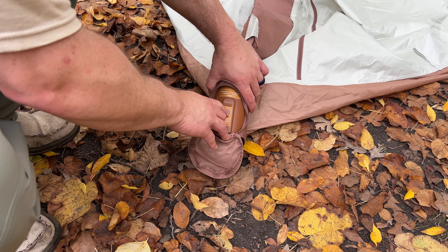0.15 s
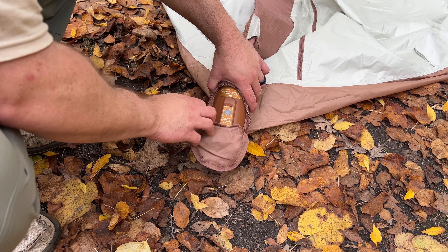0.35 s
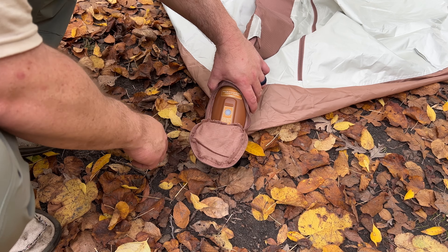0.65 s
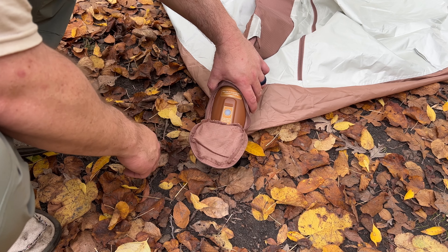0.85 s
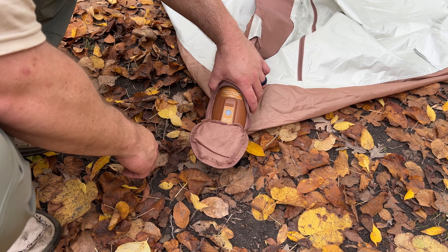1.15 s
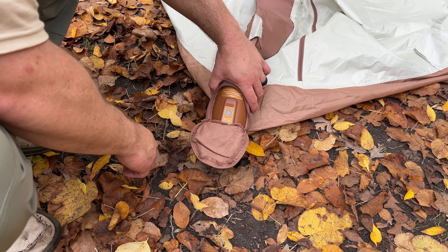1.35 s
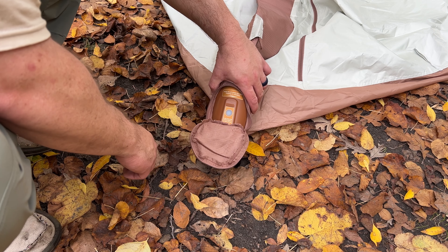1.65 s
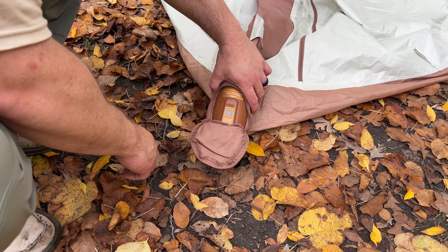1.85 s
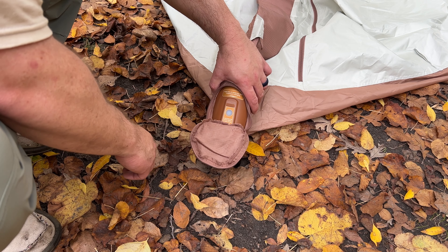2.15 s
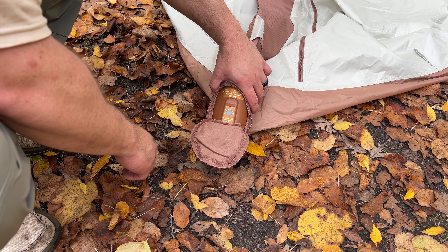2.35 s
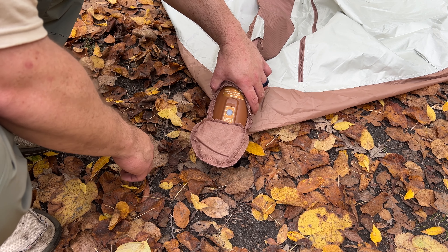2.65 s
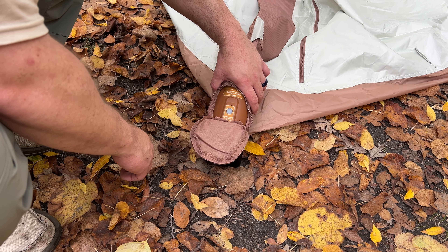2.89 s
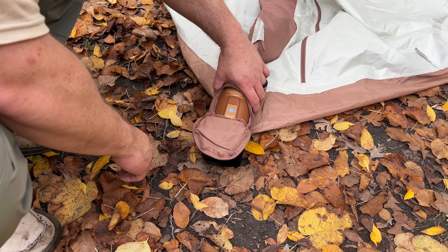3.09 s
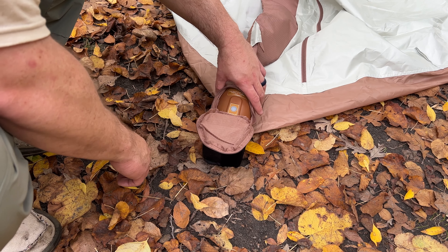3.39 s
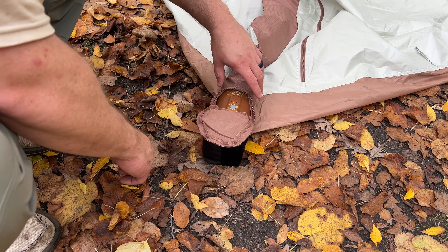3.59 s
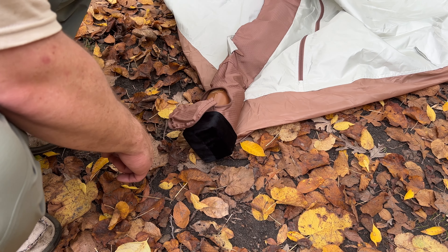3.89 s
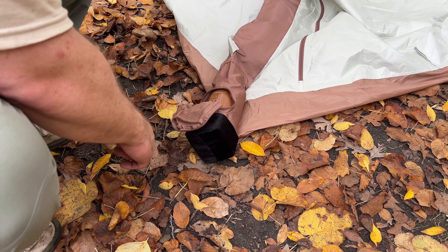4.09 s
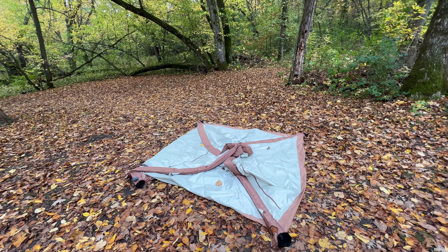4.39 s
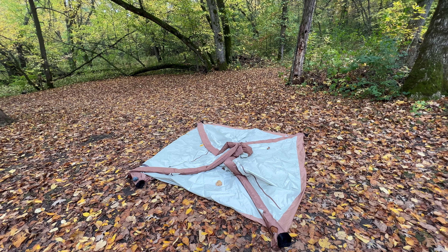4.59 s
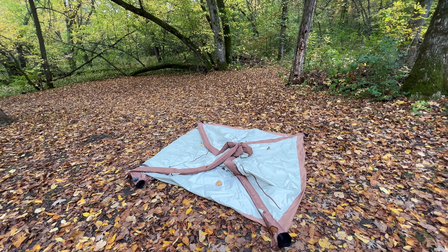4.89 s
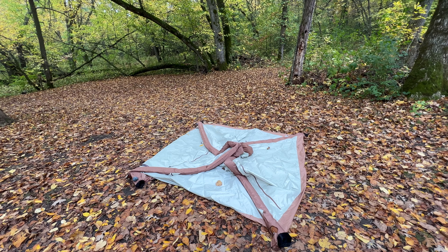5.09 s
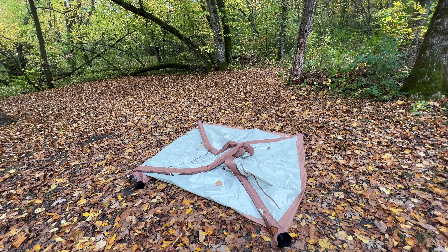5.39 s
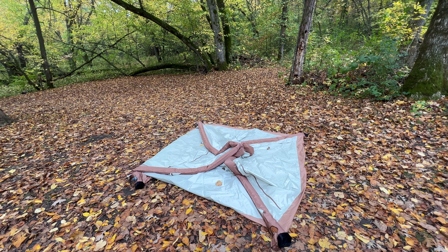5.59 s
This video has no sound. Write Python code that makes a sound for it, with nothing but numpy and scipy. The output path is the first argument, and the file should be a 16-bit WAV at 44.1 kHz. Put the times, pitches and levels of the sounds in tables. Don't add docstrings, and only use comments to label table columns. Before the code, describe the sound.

Outdoors on leaves, a small electric pump hums steadily with rushing air close to a stereo microphone. A loose fabric bag slaps rapidly, a switch clicks, and suction makes the bag flutter softly. Near three seconds it comes free with knocks and cloth rustle, and the air turns brighter and sings. After four seconds a hard cut brings a much quieter distant time lapse: thin very high whistle, airy hush and rapid leaf ticks.

```python
import sys
import numpy as np
from scipy import signal
from scipy.fft import rfft, irfft, next_fast_len
from scipy.io import wavfile
from scipy.ndimage import uniform_filter1d, map_coordinates

SR = 44100
rng = np.random.default_rng(int(sys.argv[2]) if len(sys.argv) > 2 else 0)


def decibels_to_gain(level_db):
    exponent = np.asarray(level_db, float) / 20
    return 10 ** exponent


def unload_wav(signal):
    wavfile.write(
        sys.argv[1],
        SR,
        np.round(np.clip(np.atleast_2d(signal).T, -1, 1) * 32767).astype(np.int16),
    )


N = 253134
T = np.arange(N) / SR
CUT_S = 4.3195
SIDE = np.array([[.5], [-.5]])


def unit(x):
    return x / np.sqrt(np.mean(x ** 2) + 1e-20)


def along(points, hz):
    f, v = np.transpose(points)
    return np.interp(np.log(hz + 1), np.log(f + 1), v)


def curves(rows):
    s, *cols = np.transpose(rows)
    return [np.interp(T, s, c) for c in cols]


def wobble(rate):
    return map_coordinates(rng.standard_normal(int(N * rate / SR) + 4), [T * rate])


def turns(hz):
    return 2 * np.pi * np.cumsum(hz) / SR


def ramp(s, length):
    return np.clip((T - s) / length, 0, 1)


def swells(rows):
    return sum(db * np.exp(-((T - s) / width) ** 2) for s, width, db in rows)


def filtered(x, response):
    m = next_fast_len(N + 8192)
    return irfft(rfft(x, m) * response(np.fft.rfftfreq(m, 1 / SR)), m)[..., :N]


def rush(spectrum, alike, patchy_db):
    z = signal.stft(rng.standard_normal((2, N)), nperseg=512)[2]
    field = uniform_filter1d(rng.standard_normal(z.shape[1:]), size=6, axis=0)
    field = uniform_filter1d(field, size=10, axis=1)
    pair = signal.istft(z * decibels_to_gain(patchy_db * unit(field)), nperseg=512)[1][:, :N]

    def mid_side(hz):
        turn = np.arccos(np.clip(along(alike, hz), -1, 1)) / 2
        return decibels_to_gain(along(spectrum, hz)) * [np.cos(turn), np.sin(turn)]

    mid, side = filtered(pair, mid_side)
    return unit(np.array([mid + side, mid - side]))


def ports(x, left, lead):
    def response(hz):
        return decibels_to_gain(SIDE * along(left, hz)) * np.exp(1j * SIDE * along(lead, hz))

    return filtered(x * np.ones((2, 1)), response)


def whine(rows, rough):
    hz, db = curves(rows)
    return np.sqrt(2) * decibels_to_gain(db + rough * wobble(55)) * np.sin(turns(hz * (1 + 0.0034 * wobble(50))))


def add_at(x, start_s, sound):
    x[round(start_s * SR):][:len(sound)] += sound


# pitch_hz, likeness
NEAR_ALIKE = [(60, .98), (150, 1), (640, .97), (1400, .9), (3000, .93), (5800, .35), (7000, .35),
              (8400, .72), (10000, .97), (15000, .98)]


def near_rush(spectrum, patchy_db):
    return rush(spectrum, NEAR_ALIKE, patchy_db)


# time_s, bag_stage (0 on, 1 opening, 2 open)
OPENING = [
    (2.74, 0.027),
    (2.8, .42),
    (2.9, .15),
    (3.0, 0.37),
    (3.07, 0.76),
    (3.55, 1.28),
    (3.85, 1.81),
    (4.3, 1.97),
]


def bag_opening():
    return curves(OPENING)[0]


# start_s, end_s
SUCKED = [
    (.22, 2.79),
    (2.82, 3.06),
]


def grip():
    take_hold_s, let_go_s = 0.0701, 0.0443
    return sum(ramp(a, take_hold_s) - ramp(b - let_go_s, let_go_s) for a, b in SUCKED)


def hand_on_switch():
    return 1 - ramp(0, .36) ** 2


def motor_shaft():
    settled_hz, spin_up_hz, spin_up_s = 420.6, 16.5, .8
    free_hz, open_hz = 11, 2.5
    hz = settled_hz - spin_up_hz * np.exp(-T / spin_up_s)
    hz = hz + free_hz * (1 - grip()) + open_hz * bag_opening()
    return turns(hz / 12 * (1 + .0005 * wobble(14)))


# shaft_order, bag_on_db, bag_opening_db, bag_open_db
ORDER_DB = [(6, -60, -56, -54.5), (7, -56, -63, -65), (8, -67, -69, -70), (10, -67, -70, -69),
            (11, -57, -53.5, -54), (12, -44.5, -46, -45.5), (13, -57.5, -61, -64), (14, -65, -63, -66),
            (16, -68, -70, -75), (17, -70, -70, -68), (18, -63, -63, -58), (19, -76, -66, -65),
            (21, -80, -69, -70), (23, -66, -67, -75), (24, -75, -62, -62), (25, -54, -51, -52),
            (26, -65, -67, -66), (27, -65, -70, -66), (28, -74, -67, -68), (29, -64, -71, -82),
            (30, -78, -66, -57), (31, -69, -78, -67), (32, -79, -73, -68), (35, -80, -71, -69),
            (42, -71, -82, -90), (45, -71, -76, -80), (46, -73, -70, -80), (47, -76, -72, -80),
            (48, -70, -62.5, -72), (49, -78, -70, -71)]


def motor_hum(shaft):
    stage, muffle_db = bag_opening(), -6.5 * hand_on_switch()
    hum = np.zeros(N)
    for order, *state_db in ORDER_DB:
        db = np.interp(stage, [0, 1, 2], state_db) + muffle_db + 0.128 * wobble(13)
        start = (2 * np.pi * rng.random() + .15 * wobble(9)) * (abs(order - 12) > 1.5)
        start = start + .2 * (order != 12) * wobble(20)
        hum += np.sqrt(2) * decibels_to_gain(db) * np.sin(order * shaft + start)
    return hum


# pitch_hz, level_db per Hz
RUSH_ON = [(60, -48), (100, -13.5), (240, -15), (420, -12), (560, -13), (800, -21), (1360, -19.5),
           (1620, -20.5), (2100, -24), (2370, -14.5), (2660, -27.5), (2950, -23.5), (4500, -39),
           (6000, -78)]
RUSH_OPEN = [(60, -53.5), (100, -15.5), (220, -15.5), (430, -12.5), (560, -20), (900, -18), (1340, -21),
             (1700, -19.5), (2160, -20.5), (2970, -14.5), (3600, -26), (4500, -34), (6000, -80)]
OUTLET = [(2800, -54.5), (3300, 0), (4100, 2.5), (4600, -37.5)]
# time_s, pitch_hz, level_db
SEAM = [(0, 2330, -64), (.5, 2350, -67), (1.5, 2373, -65), (2.5, 2349, -67), (2.86, 2344, -65),
        (2.95, 2370, -83)]
# time_s, pitch_hz, level_db
MOUTH = [(2.78, 2900, -83), (2.92, 3000, -68), (3.3, 3050, -64), (3.6, 2970, -62), (3.82, 3024, -63),
         (4.0, 2960, -76), (4.3, 2950, -70)]
# time_s, pitch_hz, level_db
GAP = [(2.95, 2400, -87), (3.1, 2500, -64), (3.3, 2615, -64), (3.5, 2700, -63), (3.8, 2767, -61),
       (3.87, 2760, -87)]


def intake_air(shaft):
    stage, freed = bag_opening(), ramp(2.693, 0.48) ** 1.5
    gate = 1 + 0.12 * np.sin(shaft) + 0.14 * np.sin(2 * shaft)
    air = np.sqrt(1 - freed) * decibels_to_gain(2.0) * near_rush(RUSH_ON, patchy_db=0.5)
    air += np.sqrt(freed) * decibels_to_gain(1.0) * near_rush(RUSH_OPEN, patchy_db=0.0)
    air += np.clip(stage - 1, 0, 1) * decibels_to_gain(-11.0) * near_rush(OUTLET, patchy_db=-1.3)
    singing = whine(SEAM, rough=2.5) * wobble(110)
    singing += whine(MOUTH, rough=1.5) * wobble(240)
    singing += whine(GAP, rough=1.5) * wobble(150)
    air_db = -52 + 3.5 * hand_on_switch() - stage
    return gate * (decibels_to_gain(air_db) * air + singing)


# pitch_hz, level_db per Hz
RUMBLE = [(12, -41.5), (20, -16.5), (64, 0), (129, -9.5), (163, -15.5), (180, -7.5), (230, -33.5),
          (400, -120)]
# time_s, half_width_s, rise_db
WITHDRAW = [
    (.22, 0.097, 6),
]


def air_rumble():
    db = -58.5 + swells(WITHDRAW) + 1.6 * wobble(20)
    return decibels_to_gain(db) * rush(RUMBLE, [(40, 0.93), (150, 0.75)], patchy_db=3.0)


# pitch_hz, level_db per Hz
HISS = [(2240, -29), (3800, -8), (5000, -1), (6180, -3.5), (7010, -5.5), (8590, -7), (9700, -4),
        (12600, -41)]
FIZZ = [(9000, -28.5), (10300, -2), (11200, 1), (12200, -8.5), (13500, -12), (14300, -10.5), (15400, -2.5),
        (15800, -7.5)]
CLOTH = [(3000, -40), (4500, -11.5), (6500, -4), (8300, 2), (10000, -5), (12000, -0.5), (13500, -6.5),
         (15500, -7.5)]
# time_s, half_width_s, rise_db
RUSTLES = [
    (.31, 0.069, 7.5),
    (2.87, .08, 4.5),
    (3.1, .15, 4),
    (3.36, .03, 5.5),
    (3.81, .06, 12),
]


def sleeve():
    rustle_db = swells(RUSTLES)
    leaking = ramp(.15, 0.066) - ramp(3.93, .04)
    hiss_db = -68.5 + 0.54 * rustle_db + 0.26 * wobble(13)
    fizz_db = -67.5 + 0.51 * rustle_db - 8.5 * (1 - leaking) + 0.45 * wobble(15)
    cloth_db = -85 + 2.3 * rustle_db + 1.5 * wobble(120)
    air = decibels_to_gain(hiss_db) * near_rush(HISS, patchy_db=1.05)
    air += decibels_to_gain(fizz_db) * near_rush(FIZZ, patchy_db=1.5)
    return air + decibels_to_gain(cloth_db) * near_rush(CLOTH, patchy_db=1.0)


# beat_multiple, level_db
SLAP_TONES = [(1, -3.5), (2, 0), (3, -1.5), (4, -6.5), (5, -16), (6, -16.5)]
# time_s, half_width_s, rise_db
MISSES = [
    (.078, .012, -6),
    (.125, .012, -4),
    (.184, .006, -4.5),
]


def bag_slap():
    slap_hz, end_s, dies_s = 64.4, .258, .02
    after = np.clip(T - end_s, 0, 1)
    beat = 2 * np.pi * slap_hz * T + 1.65 + 0.081 * wobble(60)
    drone = -sum(decibels_to_gain(db) * np.sin(k * beat + 0.763 * k * k) for k, db in SLAP_TONES)
    drone_db = -44.5 - 7 * (after / dies_s) ** 2 + 1.5 * wobble(18)
    smack_db = -28.5 - 17.5 * T - 147 * after
    smack_db = smack_db + swells(MISSES) + 1.2 * wobble(60)
    hits = np.clip(np.diff(np.floor(beat / (2 * np.pi)), prepend=0), 0, 1) * decibels_to_gain(smack_db)
    t = T[:SR // 50]

    def ring(hz, t60_s, start_s):
        fade = decibels_to_gain(-60 * abs(t - start_s - .001) / t60_s)
        return (t > start_s) * fade * np.sin(2 * np.pi * hz * t)

    smack = .72 * ring(1820, .009, 0)
    smack += .2 * ring(1750, .006, .0031) + .3 * ring(2280, .012, .002)
    return np.sqrt(2) * decibels_to_gain(drone_db) * drone + np.convolve(hits, smack)[:N]


# start_s, peak_db, brightness_db
TICKS = [
    (0.1464, -30.5, -15),
    (0.149, -34.5, -21),
    (0.366, -51.5, -5.5),
    (3.365, -59, 1),
    (3.689, -54, 1),
    (3.725, -57, 5),
    (3.902, -48.5, -4.5),
]


def ticks():
    x, t = np.zeros(N), T[:SR // 5]
    for s, db, bright_db in TICKS:
        crack = decibels_to_gain(bright_db + 16.5) * uniform_filter1d(rng.standard_normal(len(t)), size=3)
        for hz, gain in [(5400, .66), (4700, .88), (2900, .82)]:
            crack += gain * np.sin(2 * np.pi * hz * t)
        add_at(x, s, decibels_to_gain(db - 60 * t / .008) * (1 - np.exp(-t / .0003)) * crack)
    return x


# flap_multiple, level_db
FLAP_TONES = [(1, -0.5), (2, -9.5), (3, -20.5)]
# time_s, half_width_s, rise_db
SURGES = [(.29, 0.032, 7), (.34, 0.034, 8), (.58, 0.14, 3), (.88, 0.042, 2.5), (1.08, 0.067, -3.5),
          (1.33, 0.14, 3), (1.85, 0.17, 4), (2.25, 0.049, 4.5), (2.45, 0.096, 3), (2.88, 0.037, 5),
          (3.0, .05, 2.5)]


def bag_flutter():
    held, surge_db = grip(), swells(SURGES)
    hz = (94.46 - 0.8 * surge_db) * (1 - .4 * (1 - held))
    db = -49 + surge_db
    flap = turns(hz * (1 + .025 * wobble(21.9)))
    soft = np.zeros(N)
    for k, level_db in FLAP_TONES:
        richer_db = 0.79 * (k - 1) * np.clip(db + 47.0, -5, 9)
        soft += decibels_to_gain(level_db + 0.41 * wobble(17) + richer_db) * np.sin(k * flap + k)
    return np.sqrt(2) * held * decibels_to_gain(db) * soft


# start_s, peak_db, pitch_hz, t60_s
TAPS = [
    (0.282, -42, 1800, .012),
    (.3085, -36, 2380, .012),
    (0.326, -36, 1900, 0.011),
    (.337, -35, 2100, .01),
    (.365, -58, 14500, .03),
    (2.83, -42, 2350, .015),
    (2.853, -41, 2300, .015),
    (3.006, -39, 1900, .015),
    (3.724, -37, 1400, .012),
]


def rim_taps():
    x, t = np.zeros(N), T[:SR // 5]
    for s, db, hz, t60 in TAPS:
        add_at(x, s, decibels_to_gain(db - 60 * t / t60) * (1 - np.exp(-t / 0.00046)) * np.sin(2 * np.pi * hz * t))
    return x


# start_s, peak_db, pitch_hz, t60_s
BUMPS = [
    (1.39, -43.5, 58.7, 0.12),
    (2.27, -39, 150.2, 0.059),
    (2.75, -45, 49.8, 0.11),
    (2.849, -29, 153, 0.03),
    (3.01, -40.5, 137, 0.065),
    (3.32, -50, 55, 0.11),
    (3.445, -42.5, 59.5, 0.19),
    (3.712, -54, 109.7, 0.2),
    (3.745, -41, 62, 0.12),
    (3.787, -40.5, 58.3, 0.12),
]


def ground_bumps():
    x, t = np.zeros(N), T[:SR // 5]
    for s, db, hz, t60 in BUMPS:
        add_at(x, s, decibels_to_gain(db + 12.5 - 60 * t / t60) * (1 - np.exp(-t / 0.012)) * np.sin(2 * np.pi * hz * t))
    return x


# time_s, pitch_hz, level_db
SQUEAL = [(3.44, 6270, -91.5), (3.56, 6440, -67), (3.67, 6330, -69.5), (3.73, 6370, -90)]


def fold_squeal():
    return whine(SQUEAL, rough=1.7) * wobble(800)


# pitch_hz, level_db
NEAR_LEFT = [(60, .5), (380, 0), (700, 2), (1290, 2.5), (2380, .5), (4400, 2.5), (7000, 3), (8000, 0)]
# pitch_hz, phase_rad
NEAR_LEAD = [(60, 0), (420, .06), (900, .15), (1810, -.25), (2760, 1), (5000, .5), (7300, 1.2), (8450, 0)]


def close_shot():
    shaft = motor_shaft()
    pump = motor_hum(shaft) + intake_air(shaft) + air_rumble() + sleeve()
    hands = ticks() + rim_taps() + ground_bumps() + fold_squeal()
    close = ports(pump + bag_slap() + bag_flutter() + hands, NEAR_LEFT, NEAR_LEAD)
    lag_s, from_hz, top_hz = .000284, 8450, 15800

    def late_treble(hz):
        return np.exp(-2j * np.pi * lag_s * np.clip(hz - from_hz, 0, None) * SIDE) * (hz < top_hz)

    return filtered(close, late_treble)


# time_s, pitch_hz
WHISTLE = [(4.35, 13392), (4.47, 13394), (4.51, 13360), (4.7, 13389), (4.95, 13416), (5.25, 13402),
           (5.4, 13406), (5.6855, 13450), (5.689, 13120)]
# shaft_order, level_db, left_minus_right_db
FAR_ORDERS = [(6, -12, 3.5), (7, -16.5, 6), (8, -20.5, 6), (8.75, -24, 3.5), (9, -31, -1), (10, -21, -0.5),
              (10.25, -28.5, -4.5), (11, -9, 4.5), (11.25, -35, -0.5), (12, 2, -4), (13, -10, -8),
              (13.75, -40.5, -1), (14, -35, -1.5)]


def far_whistle():
    shaft = turns(curves(WHISTLE)[0] / 12 * (1 + .0002 * wobble(40)))
    db = -56.5 - 9.5 * np.exp(-abs(T - CUT_S) / 0.038)
    whistle = np.zeros((2, N))
    for k, level_db, left_db in FAR_ORDERS:
        gain = decibels_to_gain(level_db + SIDE * left_db + 0.29 * wobble(150))
        whistle += gain * np.sin(k * shaft - SIDE + .06 * wobble(120))
    return np.sqrt(2) * decibels_to_gain(db) * whistle


# pitch_hz, likeness
FAR_ALIKE = [(300, .3), (640, 0.58), (1410, .55), (3100, 0.87), (6820, 0.83), (15000, 0.55)]


def far_rush(spectrum, patchy_db):
    return rush(spectrum, FAR_ALIKE, patchy_db)


# pitch_hz, level_db per Hz
WOODS = [(250, -88), (400, -45.5), (900, -17), (1670, -3.5), (2500, -8.5), (4000, -19), (7000, -24),
         (12000, -44)]
FAR_AIR = [(1500, -35.5), (3000, -3), (6000, -11), (9000, -7), (11900, -6), (13000, -14), (15700, -15.5),
           (15900, -83)]
# time_s, half_width_s, rise_db
WALKS = [
    (4.54, .08, 5),
    (5.02, .13, 9),
    (5.33, 0.14, 7),
    (5.7, 0.14, 3),
]


def forest_hush():
    woods_db = -72.5 + swells(WALKS) + 4 * wobble(300)
    hush = decibels_to_gain(woods_db) * far_rush(WOODS, patchy_db=.6)
    return hush + decibels_to_gain(-69.5 + .7 * wobble(33)) * far_rush(FAR_AIR, patchy_db=1.5)


# pitch_hz, level_db per Hz
LEAVES = [(240, -69), (400, -35), (913, -10.5), (1890, 3.5), (3500, -4), (6000, -11.5), (9000, -17),
          (12500, -26.5), (15600, -45.5)]
# toe_s, heel_db, toe_db, length_ms
STEPS = [(4.3264, -75, -47.5, 5), (4.3413, -75, -51, 8.8), (4.3838, -44, -50.5, 3.7),
         (4.4382, -63, -54, 2.9), (4.4512, -72, -54, 3.1), (4.4823, -70, -53, 7.3), (4.5236, -54, -50.5, 3),
         (4.5717, -55.5, -62.5, 5.2), (4.5884, -70, -55.5, 4), (4.633, -61, -54.5, 2.5),
         (4.727, -70, -56, 2), (4.94, -56, -45, 3.1), (5.0212, -47.5, -50, 3.7), (5.058, -51, -50.5, 4.2),
         (5.1145, -45, -58, 4.1), (5.126, -70, -48, 2.7), (5.1429, -70, -46.5, 3.3), (5.179, -52, -45, 5.2),
         (5.2311, -48, -54, 3), (5.26, -68, -43.5, 4.7), (5.335, -50, -43, 3.4), (5.3833, -61.5, -43, 6.3),
         (5.4015, -71, -45, 4.2), (5.495, -51.5, -54, 4.3), (5.59, -69, -56.5, 5.7),
         (5.642, -70.5, -54.5, 4.6), (5.7, -58, -43, 3.1), (5.7185, -66, -55.5, 3.5),
         (5.7333, -61, -49.5, 3.8)]
# time_s, peak_db, length_ms
SCUFFS = [(4.347, -56, 1.7), (4.425, -56, 2.5), (4.468, -60, 4), (4.511, -53, 3), (4.544, -58, 4),
          (4.554, -62, 3), (4.605, -54.5, 3.3), (4.622, -60, 4), (4.641, -59, 3), (4.677, -62, 5),
          (4.866, -58.5, 3), (4.931, -59.5, 2), (4.962, -60.5, 3), (4.9858, -57, 2), (4.999, -60, 2),
          (5.028, -55, 3.7), (5.065, -55, 3.2), (5.083, -55, 3), (5.091, -55, 3.2), (5.25, -58, 3),
          (5.29, -56, 5), (5.32, -54, 4), (5.343, -50, 2.8), (5.368, -61, 1.8), (5.423, -63, 4),
          (5.444, -55, 4), (5.467, -60, 2), (5.528, -57, 4), (5.548, -60, 3), (5.567, -59, 2),
          (5.625, -59, 2.5), (5.636, -55, 3), (5.6775, -52, 1.5), (5.696, -51, 2.2), (5.708, -50, 3)]


def leaf_steps():
    heel_early_s, snap_db = .01, -5
    heels = [(s - heel_early_s, db, ms) for s, db, _, ms in STEPS]
    toes = [(s, db, ms) for s, _, db, ms in STEPS]
    crunch = np.zeros(N)
    for s, peak_db, ms in heels + toes + SCUFFS:
        near = slice(round((s - .02) * SR), round((s + .04) * SR))
        width_s = 0.00079 * max(ms - .6, 1)
        crunch[near] += decibels_to_gain(peak_db - 2.5) * np.exp(-abs((T[near] - s) / width_s) ** 1.2)
    leaves = far_rush(LEAVES, patchy_db=.7)
    leaves /= np.sqrt(abs(uniform_filter1d(leaves.mean(0) ** 2, size=150)) + .05)
    snaps = np.bincount([round(s * SR) for s, *_ in toes], [decibels_to_gain(db + snap_db) for _, db, _ in toes], N)
    snaps = filtered(snaps, lambda hz: decibels_to_gain(along(LEAVES, hz)))
    snaps *= decibels_to_gain(snap_db + max(db for _, db, _ in toes)) / abs(snaps).max()
    steps = snaps + crunch * decibels_to_gain(3.16 * wobble(700) - 1.5) * leaves
    return filtered(steps, lambda hz: 1 / (1 + (750 / (hz + 1)) ** 4))


# time_s, pitch_hz, level_db
GLIDE = [(4.6, 5600, -95), (4.8, 5620, -81), (4.86, 5480, -81), (4.93, 5360, -80), (4.98, 5600, -81),
         (5.48, 5500, -81), (5.52, 5200, -81), (5.58, 4500, -82), (5.62, 4400, -100)]


def passing_drone():
    return whine(GLIDE, rough=1.2)


# time_s, pitch_hz, level_db
CALL = [(4.73, 3000, -100), (4.755, 3010, -76), (4.78, 3030, -66), (4.82, 2990, -70), (4.835, 2970, -67),
        (4.86, 2960, -76), (4.9, 2990, -95)]


def far_horn():
    return decibels_to_gain(-1) * whine(CALL, rough=1.2)


# pitch_hz, level_db
FAR_LEFT = [(380, 3), (700, 2), (1290, 6), (4400, 8), (8120, 6.5), (15000, -3.5)]
# pitch_hz, phase_rad
FAR_LEAD = [(300, 0.27), (2300, 0.6), (5500, 0.3), (9000, 0.16), (15000, -.7)]


def time_lapse():
    whistle = far_whistle()
    ground = forest_hush() + leaf_steps() + passing_drone() + far_horn()
    return whistle + ports(ground, FAR_LEFT, FAR_LEAD)


def scene():
    close = close_shot() * np.clip((CUT_S - T) / 0.0012, 0, 1)
    return close + time_lapse() * ramp(CUT_S, 0.0045)


def roll_off(x):
    return signal.sosfilt(signal.butter(12, 16780, fs=SR, output="sos"), x)


def record(dry):
    return roll_off(dry)


dry = scene()
out = record(dry)
unload_wav(out)
```